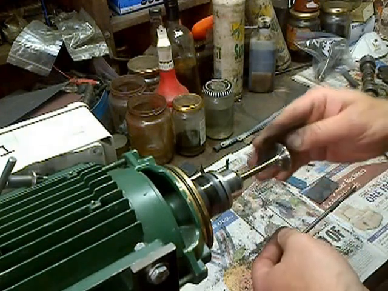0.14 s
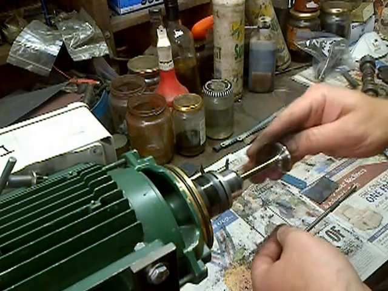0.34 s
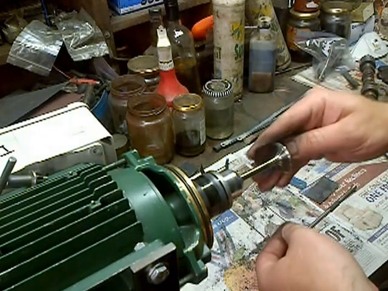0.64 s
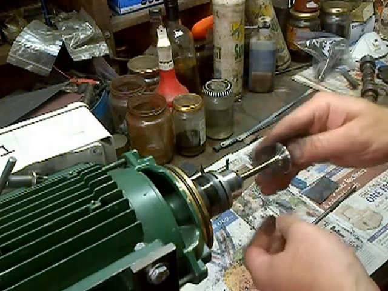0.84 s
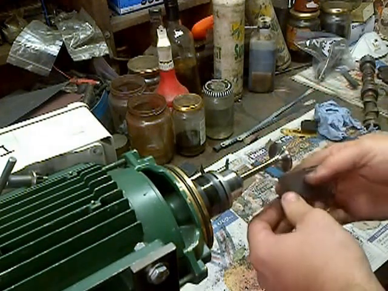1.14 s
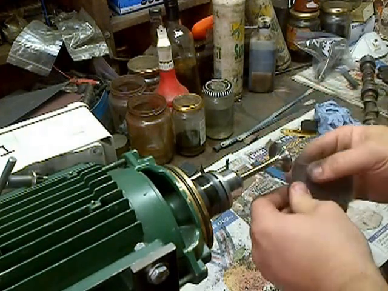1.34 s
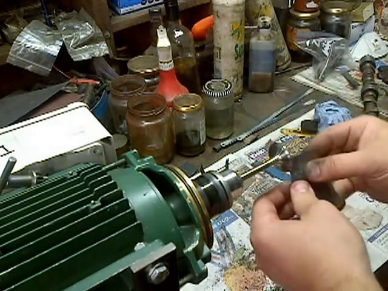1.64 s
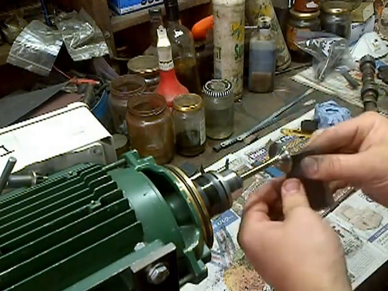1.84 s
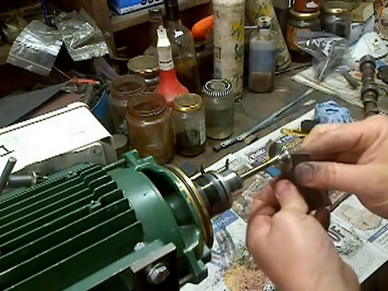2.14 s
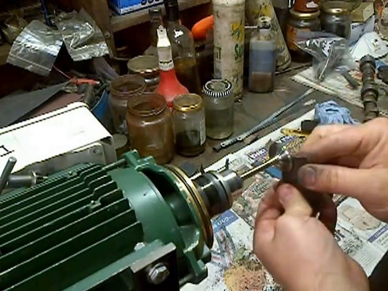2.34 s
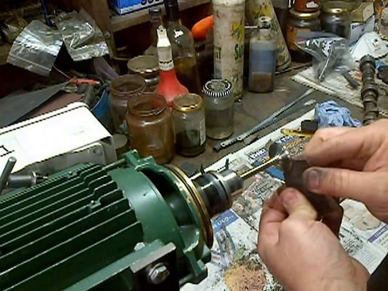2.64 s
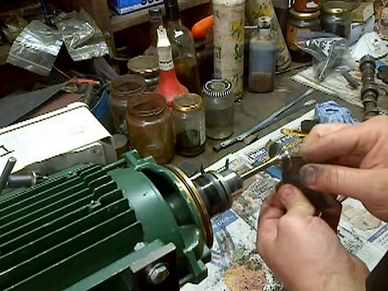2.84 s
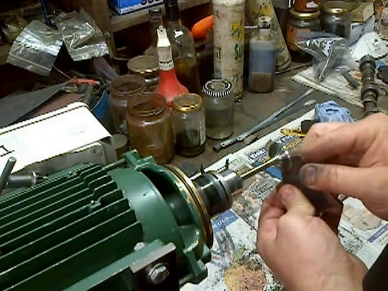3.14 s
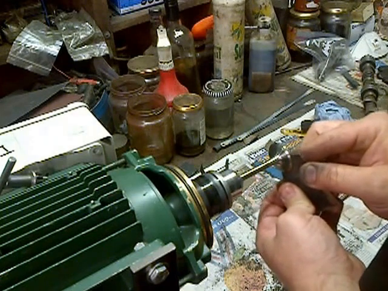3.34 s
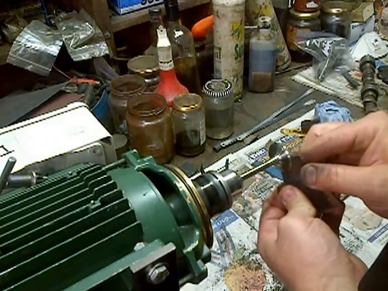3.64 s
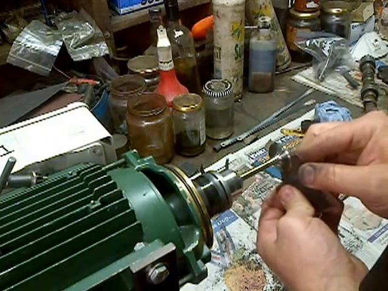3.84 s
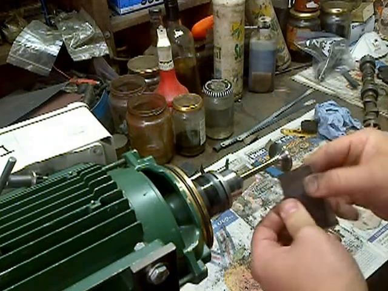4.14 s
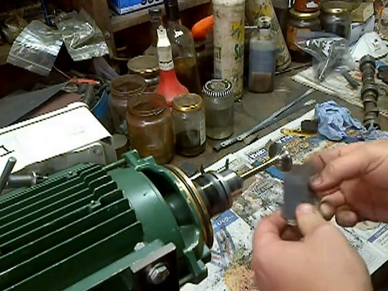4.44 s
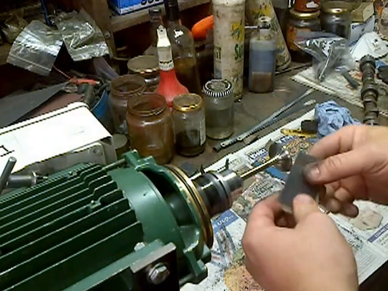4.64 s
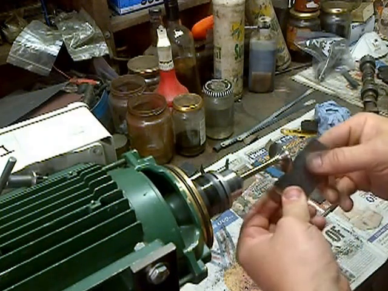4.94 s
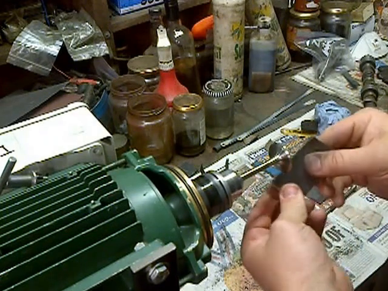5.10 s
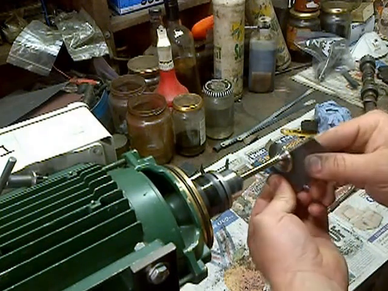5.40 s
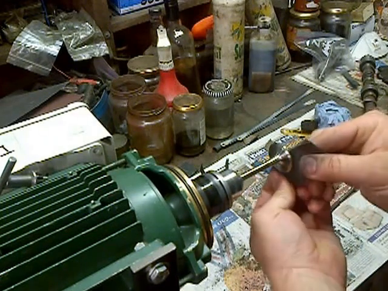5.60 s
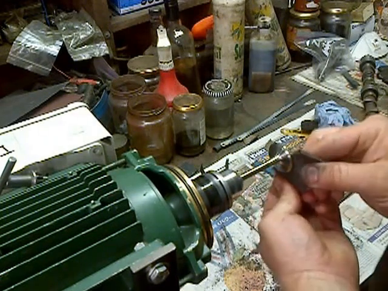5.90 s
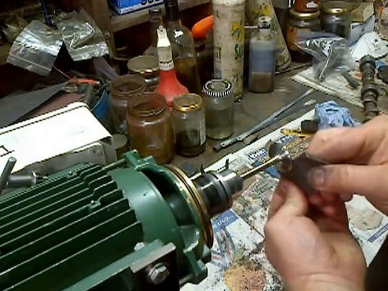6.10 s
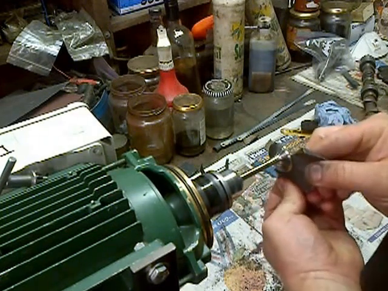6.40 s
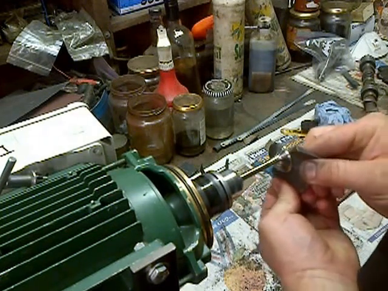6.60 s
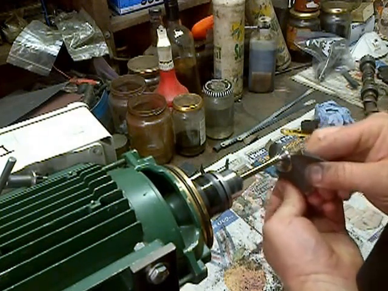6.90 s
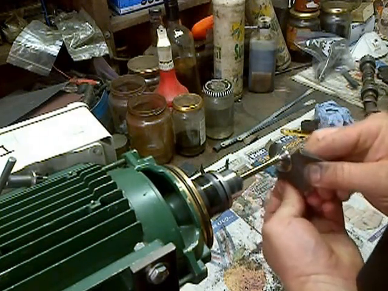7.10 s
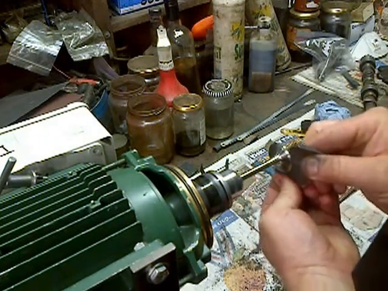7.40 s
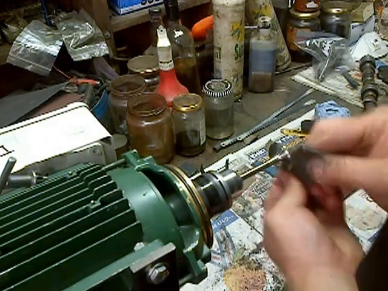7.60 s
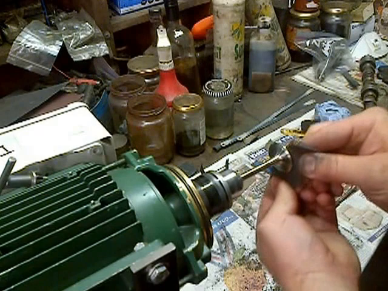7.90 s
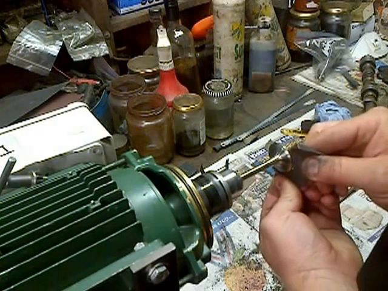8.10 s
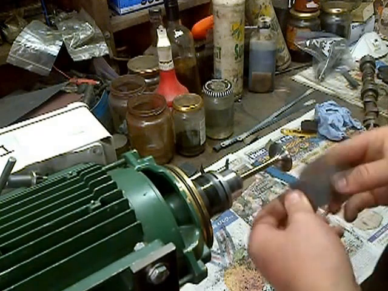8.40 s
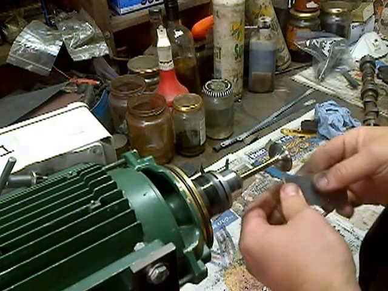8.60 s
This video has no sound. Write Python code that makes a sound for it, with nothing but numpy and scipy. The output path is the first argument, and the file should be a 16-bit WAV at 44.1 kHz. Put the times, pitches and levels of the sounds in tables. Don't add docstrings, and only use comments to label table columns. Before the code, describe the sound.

A motor runs throughout, a steady airy roar of fan and bearings, strongest in the middle range, with a weak hum and slightly wavering shaft tones. From the start to about 1.4 s, abrasive paper rubs lightly on a spinning metal valve: uneven gritty hiss, faint steel ring, a few dry snaps. Motor alone until 2.4 s, when a firm pass bites quickly, loudest around 2.5 to 3 s, then eases with pulsing pressure, ending with sharp cracks near 4.4 s and lifting at 4.55 s. A tiny dull brush follows at 4.65 s, a snap at 5.5 s and a brighter brush at 5.75 s. The third pass starts at 6.1 s, strong until 6.8 s, then fades into thinner scraping with ringing metal. From 7.5 s, and especially 8.1 to 8.7 s, squeezes and hard snaps crowd together, continuing to the end. Close, dry, band-limited small microphone with a grainy metallic treble.

```python
import sys
import numpy as np
from scipy import signal
from scipy.fft import rfft, irfft
from scipy.io import wavfile
from scipy.ndimage import uniform_filter1d

SR = 44100
rng = np.random.default_rng(int(sys.argv[2]) if len(sys.argv) > 2 else 0)


def gain_from_decibels(decibels):
    exponent = np.asarray(decibels, float) / 20
    return 10 ** exponent


def transcribe(u):
    v = np.clip(np.atleast_2d(u).T, -1, 1)
    q = np.round(v * 32767).astype(np.int16)
    wavfile.write(sys.argv[1], SR, q)


N = 385875

# frequency in Hz, level in dB per Hz.
ROAR = [(94, -76), (160, -26), (184, -29.5), (237, -14.5), (273, -14), (330, -10.5), (387, -12),
        (497, -9.5), (798, -9.5), (1470, 2.5), (1810, -5.5), (2330, -15.5), (2990, -2.5), (3450, -18),
        (6900, -33), (8970, -75), (15200, -120)]
# frequency in Hz, width in Hz, level in dB.
CASING = [(336, 37, -14.5), (657, 46, -17.5), (713, 46, -16.5), (1133, 75, -10.5), (1201, 38, -6.5),
          (1457, 53, -2), (1616, 46, -22), (1793, 93, -3.5), (2522, 176, -15), (2897, 126, -7.5),
          (3060, 110, -11.5), (3970, 250, -21), (5400, 250, -31)]
# frequency in Hz, level in dB rms, wobble in dB.
TONES = [(197, -62.5, 2), (245.3, -58.5, 3), (346.7, -56, 2.5), (545.4, -61, 6.5), (643.6, -53.5, 3),
         (691, -67, -0.5), (750, -60, 0), (989, -54.5, -3), (1496, -45.5, 2)]
# time in seconds, level in dB.
HANDS = [(0.0, 1), (1.14, 2.5), (1.46, -1.5), (1.95, 5), (2.31, 2), (3.04, -2.5), (3.75, -3.5),
         (4.41, -4.5), (4.99, 2.5), (5.87, 2.5), (6.21, -5), (7.24, -5), (8.19, -2.5), (8.75, -5)]
# time in seconds, pressure as grit level in dB,
# tilt of the paper as brightness in dB.
PASSES = [
    [(0.006, -45, -4.5), (0.2, -39.5, -0.5), (0.325, -47, -1), (0.53, -40.5, 2), (0.7, -44.5, -8),
     (0.9, -51, -6), (1.03, -42.5, 0), (1.16, -43, -3), (1.395, -43, 3)],
    [(2.426, -49, -9), (2.468, -39, -2.5), (2.54, -32, 0), (2.8, -34, -3), (3.0, -35, -1.5),
     (3.12, -37.5, -0.5), (3.44, -41, -2.5), (4.15, -38.5, -2), (4.545, -45, -6)],
    [(6.09, -44, 9), (6.19, -43, -1.5), (6.262, -34.5, -1.5), (6.75, -35.5, -2.5), (6.95, -41, -5),
     (8.05, -44, -2.5), (8.4, -39.5, -2), (8.63, -41.5, -1), (8.75, -41, -4)],
]
# time in seconds, grit level in dB, brightness in dB.
BRUSHES = [
    [(4.63, -50, -6), (4.645, -43, -6), (4.662, -54, -7)],
    [(5.7, -52, -1), (5.76, -44, -0.5), (5.8, -58, -1)],
]
# peak time in seconds, extra pressure in dB, half length in seconds.
SQUEEZES = [(0.09, 6.5, .07), (0.625, 4.5, 0.042), (0.74, 6.5, 0.036), (0.808, 8, 0.023), (2.57, 3, 0.031),
            (2.744, 2.5, 0.13), (2.91, 5, .06), (3.3, 8, 0.14), (3.543, 3.5, 0.17), (3.797, 6, 0.072),
            (4.404, 10, 0.082), (4.527, 6.5, .03), (6.09, 7.5, 0.054), (7.034, 3.5, .08), (7.18, 5, .085),
            (7.35, 3, 0.063), (7.568, 9, 0.046), (7.748, 2.5, 0.07), (7.938, 5, 0.092), (8.102, 13, .055),
            (8.225, 10, 0.06), (8.283, 12, 0.055), (8.465, 6, .025), (8.513, 6.5, 0.03)]
GRIP_RING_DB = [-4, -8, -8, -12, -12]
# frequency in Hz, width in Hz, level in dB.
RING_FIRST = [(3740, 60, -5), (4640, 48, -6), (5276, 86, -1.5)]
RING_SECOND = [(3910, 75, 1.5), (4340, 31, 2), (4720, 38, -5), (5260, 8.6, -7), (5870, 86, -16),
               (6450, 32, -20)]
RING_THIRD = [(3700, 65, 5), (4200, 60, -4), (4790, 110, 8), (5660, 420, 4), (6000, 260, 3)]
# frequency in Hz, level in dB per Hz.
GRIT = [(2000, -34), (3400, -3), (3990, -1.5), (5020, -6.5), (5600, -1), (6500, -1), (8450, -8),
        (14300, -120)]
# frequency in Hz, level in dB per Hz.
GRIT_BODY = [(300, -43), (700, -3), (1500, -36), (2400, -10), (3000, -5)]
# start in seconds, peak
# level in dB, pitch in Hz.
SNAPS = [(0.0875, -16, 4530), (0.511, -18, 5640), (0.6415, -20, 4420), (0.799, -19, 4210),
         (2.571, -15, 4840), (2.579, -15, 5680), (2.6284, -18, 4750), (2.9205, -16, 4200),
         (3.006, -17, 4540), (3.2973, -16.5, 4020), (3.3246, -20, 4350), (4.3952, -13, 5300),
         (4.4015, -12, 3800), (4.4217, -29, 4480), (5.5422, -22, 4640), (6.3564, -20, 5260),
         (7.5526, -19, 5120), (7.5915, -19, 4230), (7.9349, -19, 5000), (8.0888, -16, 5430),
         (8.1008, -17, 5400), (8.2323, -13, 5460), (8.2872, -18, 4650), (8.3024, -13, 5430),
         (8.4484, -10, 4300), (8.4598, -17, 5040), (8.5025, -12, 4300), (8.5195, -15, 5240),
         (8.6691, -16.5, 5870), (8.7281, -17, 5230),
         (0.242, -22, 4300), (0.447, -23, 5450), (0.717, -23, 4530), (0.9976, -26, 4810),
         (1.2913, -27, 5560), (2.762, -15, 4590), (2.778, -20, 4350), (3.069, -20, 5100),
         (3.155, -19, 5100), (3.2603, -23, 4300), (3.993, -21, 4120), (4.5297, -22, 5660),
         (6.1598, -23, 5700), (6.2675, -19, 5420), (6.5757, -27, 4820), (6.615, -22, 4120),
         (6.8976, -21, 5390), (7.268, -21, 4470), (7.516, -18.5, 4410), (7.6467, -19, 5300),
         (8.0197, -22, 5490), (8.069, -27, 4580), (8.106, -19, 5140), (8.272, -22, 5090),
         (8.5614, -21, 5160), (8.733, -22, 5090)]
# low edge in Hz, high edge in Hz, chance from 0 to 1.
STARVED = [(7500, 8000, .3), (8000, 8500, .3), (13900, 15000, .16)]

HUM_DB, LOWER_DB, CASING_DB = -39, -47, -32.5
HUM_FOLLOWS, CASING_FOLLOWS = -0.12, 0.073
CASING_SAG_DB_PER_S = 0.14
SHAFT_TONE_HZ, SHAFT_TONE_DB, SHAFT_SWELL_DB = 494.2, -50, 3
SQUEEZE_BRIGHTENS, SQUEEZE_RINGS = 0.14, 0.13
CONTACT_S = 0.004
RING_WAVER_DB = 2.5
CRACKLE_OVER_GRIT_DB, CRACKLE_SPREAD_DB = 7, 5
CRACKLE_LOW_HZ, CRACKLE_HIGH_HZ = 3900, 5960
RUSTLE_DB = -10.5
MIC_LOW_HZ, MIC_HIGH_HZ = 186, 6537
MIC_HISS_DB, MIC_RUMBLE_DB = -72, -61
STEP_RATE, TOP_HZ = 16000, 14660


def rms_one(x):
    return x / np.sqrt(np.mean(x ** 2) + 1e-20)


def in_time(rows):
    s, *columns = np.transpose(rows)
    return [np.interp(np.arange(N) / SR, s, c) for c in columns]


def drift(rate):
    r = np.exp(-80 * np.pi * rate / SR)
    noise = rng.standard_normal(N // 40 + 2002)
    slow = signal.lfilter([1], [1, -2 * r, r * r], noise)[2000:]
    return np.interp(np.arange(N) / 40, np.arange(len(slow)), rms_one(slow - slow.mean()))


def colour(x, spectrum):
    hz, db = np.transpose(spectrum)
    grid = np.fft.rfftfreq(N, 1 / SR) + 1
    gain = gain_from_decibels(np.interp(np.log(grid), np.log(hz), db))
    return irfft(rfft(x) * gain, N)


def resonate(x, hz, width):
    r = np.exp(-np.pi * width / SR)
    feed = np.array([1, 0, -1]) * (1 - r * r) / 2
    return signal.lfilter(feed, [1, -2 * r * np.cos(2 * np.pi * hz / SR), r * r], x)


def split(x, hz):
    low = signal.sosfiltfilt(signal.butter(4, hz, fs=SR, output="sos"), x)
    return low, x - low


def motor():
    open_db, = in_time(HANDS)
    from_middle_s = (np.arange(N) - N / 2) / SR
    casing_db = CASING_DB + CASING_FOLLOWS * open_db - CASING_SAG_DB_PER_S * from_middle_s

    air = rms_one(colour(rng.standard_normal(N), ROAR)) * gain_from_decibels(0.54 * drift(29.0))
    modes = np.zeros(N)
    for hz, width, db in CASING:
        modes += gain_from_decibels(db + 1.1 * drift(8.5)) * resonate(rng.standard_normal(N), hz, width)
    hum, rest = split(air + rms_one(modes), 972)
    lower, casing = split(rest, 1332)

    out = gain_from_decibels(HUM_DB + HUM_FOLLOWS * open_db) * rms_one(hum)
    out += gain_from_decibels(LOWER_DB + open_db) * rms_one(lower)
    out += gain_from_decibels(casing_db) * rms_one(casing)

    slip = 1 + 0.00247 * drift(0.76)
    turns = np.cumsum(slip) / SR
    shaft_level = gain_from_decibels(SHAFT_TONE_DB + SHAFT_SWELL_DB * drift(1.9))
    out += np.sqrt(2) * shaft_level * np.sin(2 * np.pi * SHAFT_TONE_HZ * turns)
    for hz, db, wobble_db in TONES:
        level = gain_from_decibels(db + wobble_db * drift(2.1))
        out += np.sqrt(2) * level * np.sin(2 * np.pi * (hz * turns + rng.random()))
    return out


def pressure():
    t = np.arange(N) / SR
    squeeze_db = sum(db * np.clip(1 - np.abs(t - s) / half, 0, 1) for s, db, half in SQUEEZES)
    for rows, ring_db in zip(PASSES + BRUSHES, GRIP_RING_DB):
        grit_db, bright_db = in_time(rows)
        landing = t - rows[0][0] + CONTACT_S
        lifting = rows[-1][0] + CONTACT_S - t
        touching = np.clip(np.minimum(landing, lifting) / CONTACT_S, 0, 1)
        bright_db = bright_db + SQUEEZE_BRIGHTENS * squeeze_db
        yield touching, grit_db + squeeze_db, bright_db, ring_db + SQUEEZE_RINGS * squeeze_db


def grit(grains_per_s, spread_db, clump_db):
    force = gain_from_decibels(spread_db * np.minimum(rng.exponential(1, N), 5)) * rng.choice([-1, 1], N)
    chance = grains_per_s * gain_from_decibels(clump_db * drift(25)) / SR
    return rms_one(force * (rng.random(N) < chance))


def scrape():
    grains = grit(grains_per_s=14000, spread_db=4.0, clump_db=1.26)
    dull, bright = map(rms_one, split(colour(grains, GRIT_BODY + GRIT[1:-1]), 5440))
    flutter_db = 0.41 + 0.7 * drift(12)
    out = np.zeros(N)
    rings = [RING_FIRST, RING_SECOND, RING_THIRD, RING_SECOND, RING_THIRD]
    for (touching, grit_db, bright_db, ring_db), ring in zip(pressure(), rings):
        bright_share = np.clip(gain_from_decibels(2 * bright_db), .02, .9)
        hiss = gain_from_decibels(2.5) * np.sqrt(1 - bright_share) * dull + np.sqrt(bright_share) * bright
        steel = np.zeros(N)
        for hz, width, db in ring:
            steel += gain_from_decibels(db + RING_WAVER_DB * drift(5.0)) * resonate(grains, hz, width)
        out += touching * gain_from_decibels(grit_db + flutter_db) * (hiss + gain_from_decibels(ring_db) * rms_one(steel))
    return out


def crackles(count):
    when, pitch, size = rng.random((count, 3)).T
    at = (when * (N - 1)).astype(int)
    level = sum(touching[at] * gain_from_decibels(grit_db[at]) for touching, grit_db, *_ in pressure())
    db = 20 * np.log10(level + 1e-9) + CRACKLE_OVER_GRIT_DB + CRACKLE_SPREAD_DB * (size - .5)
    hz = CRACKLE_LOW_HZ + (CRACKLE_HIGH_HZ - CRACKLE_LOW_HZ) * pitch
    return list(zip(at / SR, db, hz))


def snaps():
    span = int(0.032 * SR)
    t = np.arange(span) / SR
    rows = SNAPS + crackles(count=220)
    noise = rng.standard_normal((len(rows), span))
    out = np.zeros(N + span)
    swell = t / 0.00013
    for (s, db, hz), hiss in zip(rows, noise):
        crack = np.e * swell * np.exp(-swell) * np.cos(2 * np.pi * hz * t)
        rustle = resonate(hiss, hz, 3000) * np.exp(-t / 0.0036)
        start = int(s * SR)
        out[start:start + span] += gain_from_decibels(db + 2.5) * (crack + gain_from_decibels(RUSTLE_DB + 6.5) * rustle)
    return out[:N]


def scene():
    return np.tile(motor() + scrape() + snaps(), (2, 1))


def band_flecks(x, share, fleck_db):
    hz, frames, cells = signal.stft(x, SR, nperseg=2048)
    band = (np.log(hz + 3500) * 22).astype(int)
    struck = (rng.random((band.max() + 1, len(frames))) < share)[band] & (hz > 1500)[:, None]
    fleck_level = gain_from_decibels(fleck_db + 9.8 * np.log2(hz / 3000 + 1))[:, None]
    side = cells * struck * np.exp(2j * np.pi * rng.random(cells.shape)) * fleck_level

    grit_power = np.sum(np.abs(cells[(hz > 4000) & (hz < 7000)]) ** 2, axis=0)
    busy = grit_power > .25 * np.median(grit_power)
    kept = np.ones(cells.shape)
    for low_hz, high_hz, chance in STARVED:
        runs = uniform_filter1d(rng.random(len(frames)), size=3)
        dropped = busy & (runs < np.quantile(runs, chance))
        kept[np.ix_((hz > low_hz) & (hz < high_hz), dropped)] = 0
    return [signal.istft(part, SR, nperseg=2048)[1][:N] for part in (cells * kept, side)]


def top_cut(x):
    return signal.sosfilt(signal.butter(12, 15200, fs=SR, output="sos"), x)


def record(dry):
    x = signal.sosfilt(signal.butter(5, MIC_LOW_HZ, "high", fs=SR, output="sos"), dry[0])
    x = signal.sosfilt(signal.butter(14, MIC_HIGH_HZ, fs=SR, output="sos"), x)
    steps = signal.resample_poly(x, STEP_RATE // 100, SR // 100)
    steps = steps + gain_from_decibels(MIC_HISS_DB) * rng.standard_normal(len(steps))
    flicker = signal.lfilter([.1], [1, -.9], rng.standard_normal(len(steps)))
    steps = steps + gain_from_decibels(MIC_RUMBLE_DB) * flicker

    area = np.cumsum(steps)
    index = np.arange(len(area))
    at = (np.arange(N) / SR * STEP_RATE) - .5
    half = 0.24
    held = (np.interp(at + half, index, area) - np.interp(at - half, index, area)) / (2 * half)
    held = signal.sosfilt(signal.cheby2(16, 60, TOP_HZ + 250, fs=SR, output="sos"), held)
    mid, side = band_flecks(held, share=.022, fleck_db=-30.5)
    return top_cut(np.array([mid + side, mid - side]))


dry = scene()
out = record(dry)
transcribe(out)
```